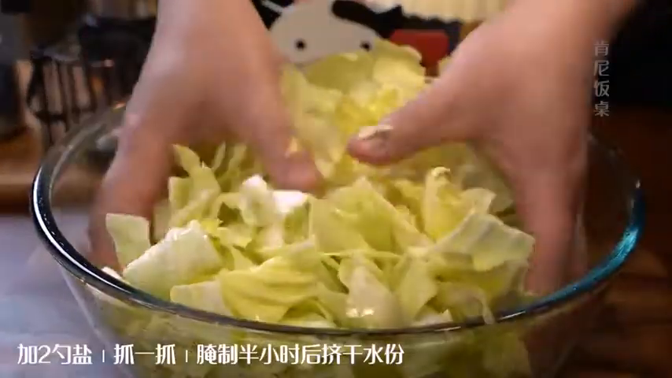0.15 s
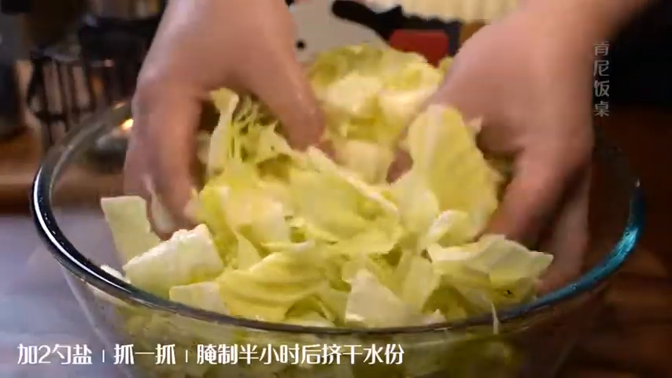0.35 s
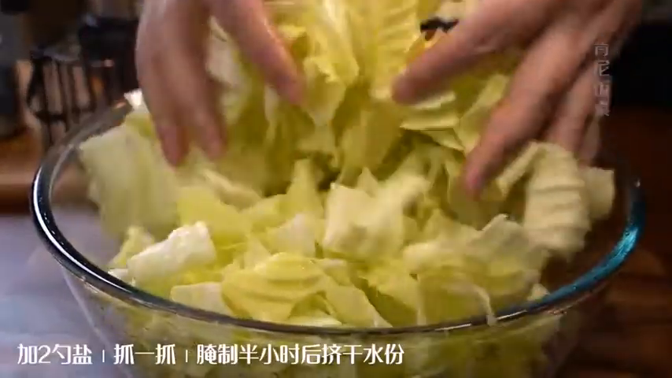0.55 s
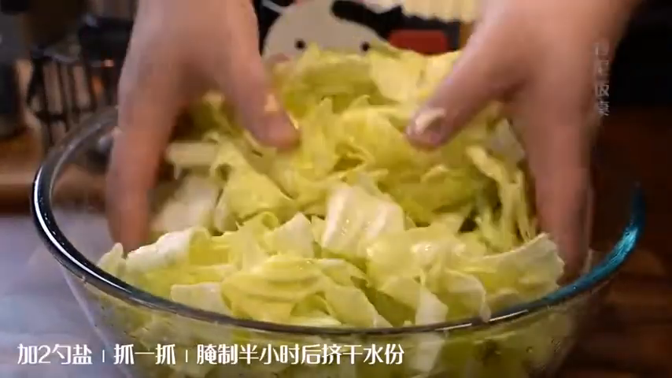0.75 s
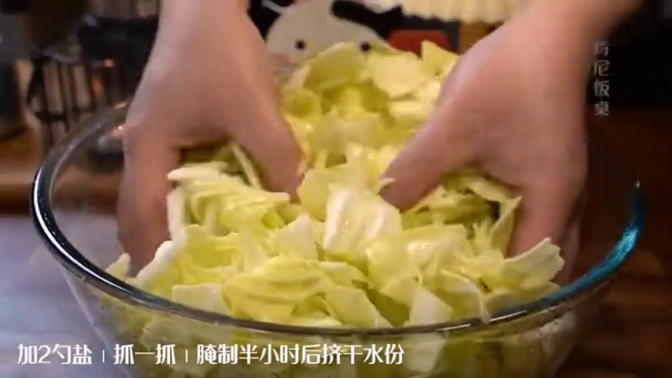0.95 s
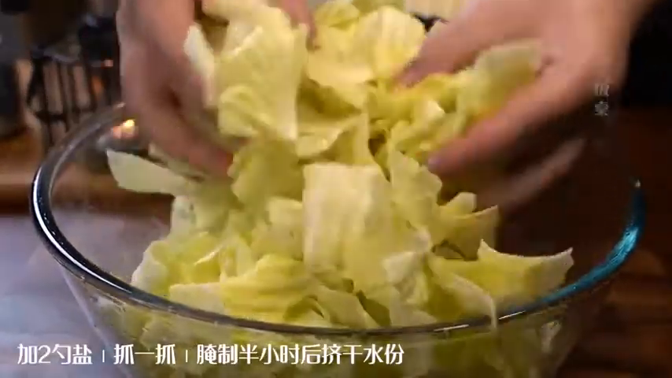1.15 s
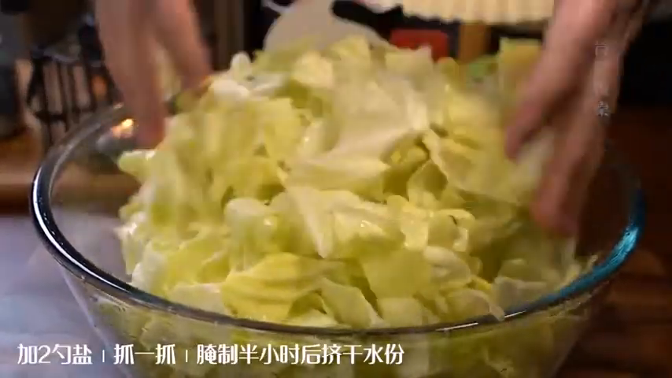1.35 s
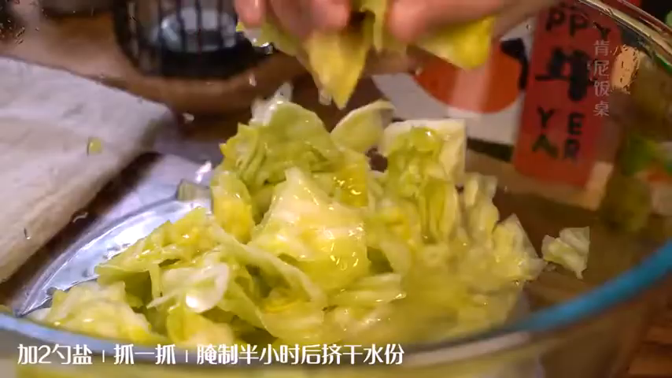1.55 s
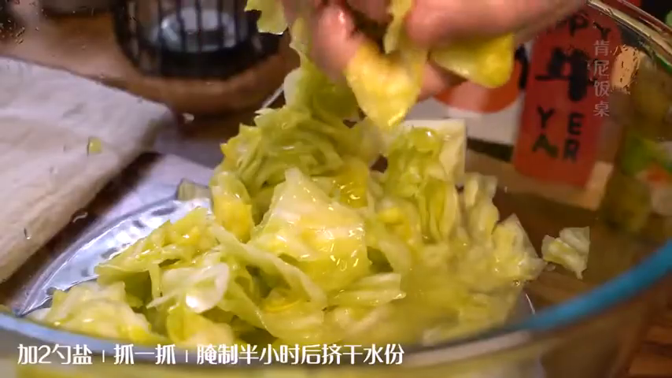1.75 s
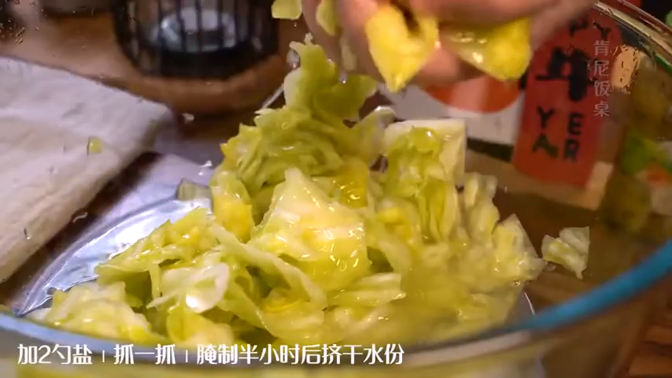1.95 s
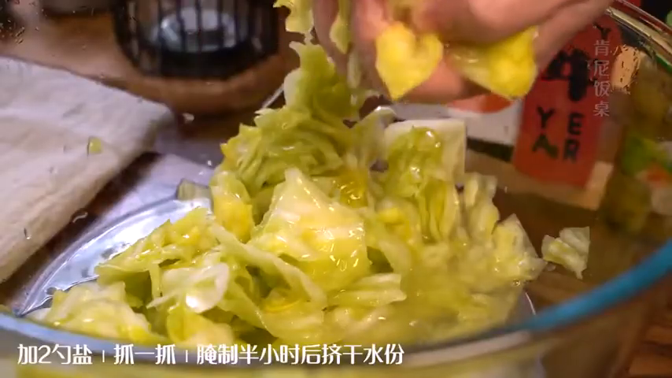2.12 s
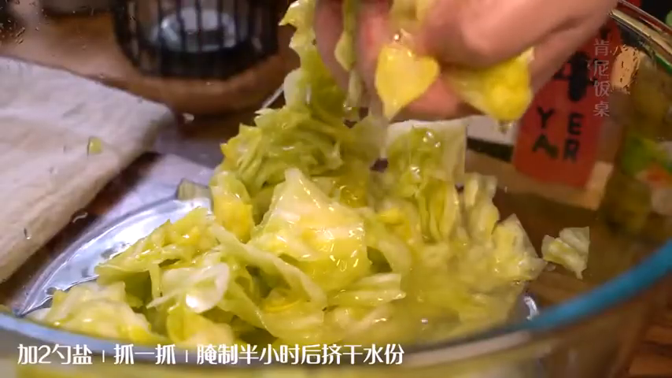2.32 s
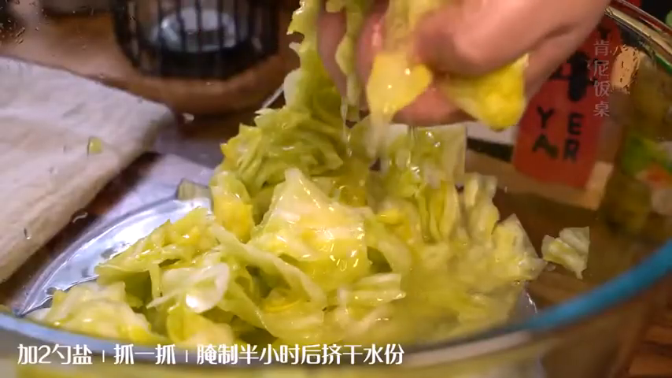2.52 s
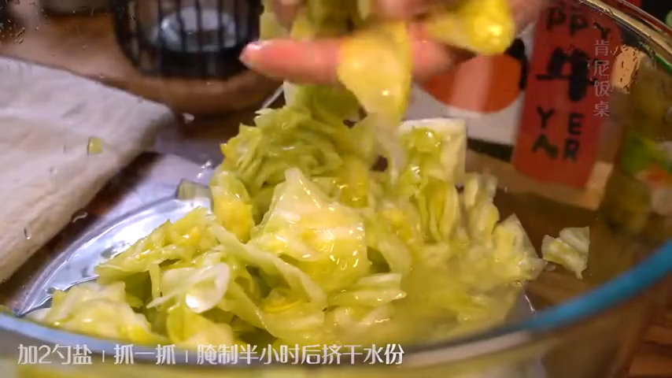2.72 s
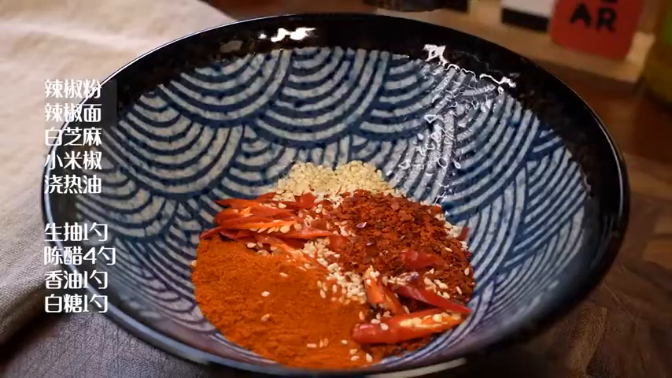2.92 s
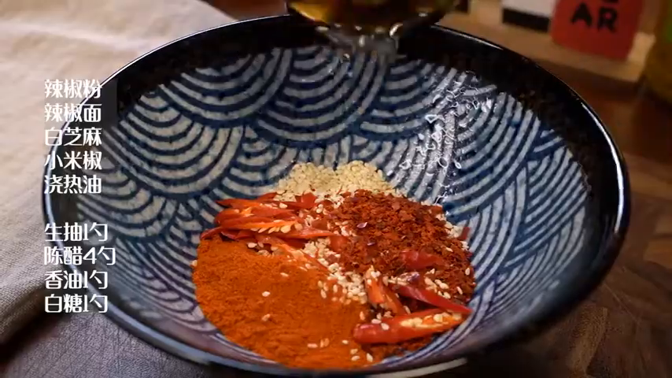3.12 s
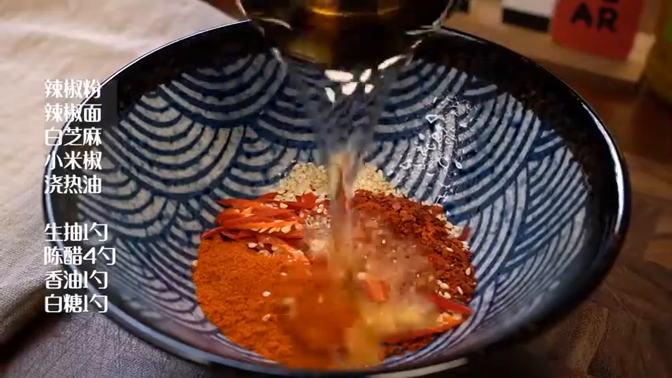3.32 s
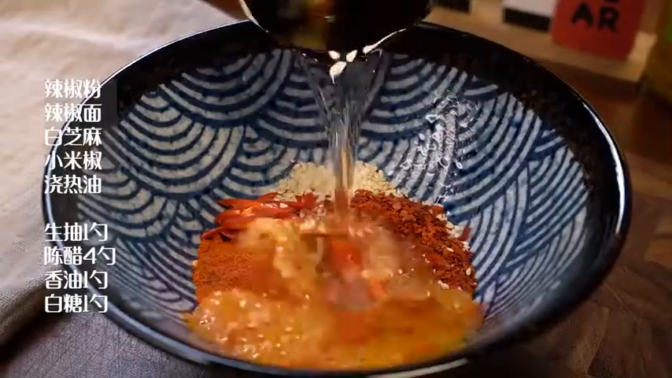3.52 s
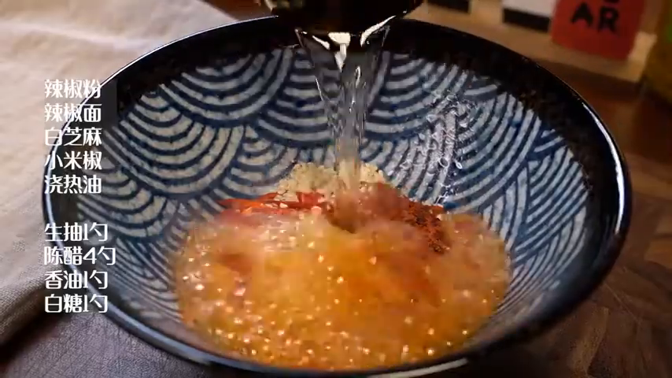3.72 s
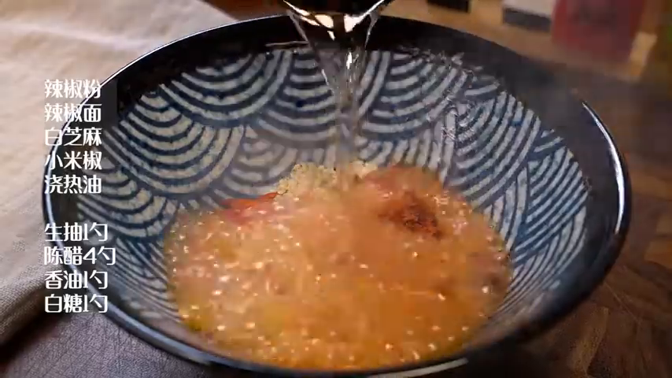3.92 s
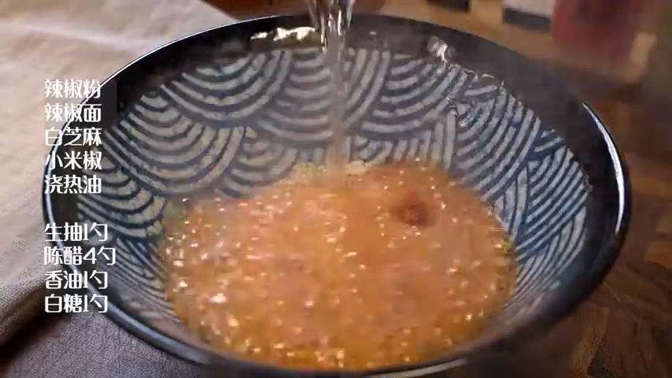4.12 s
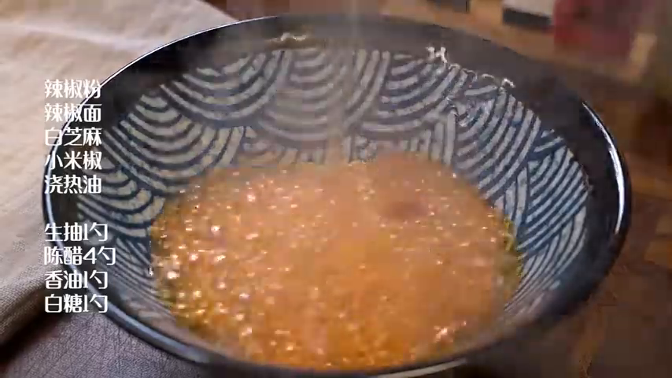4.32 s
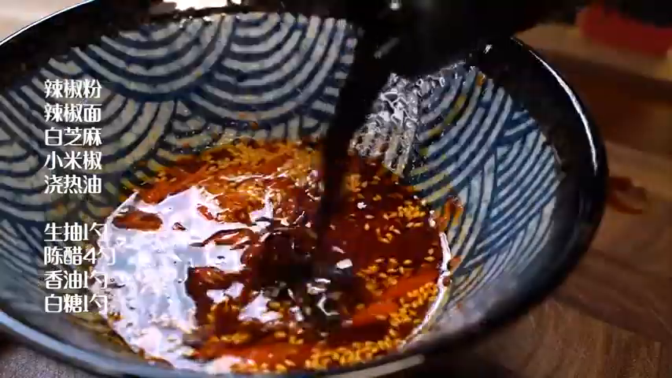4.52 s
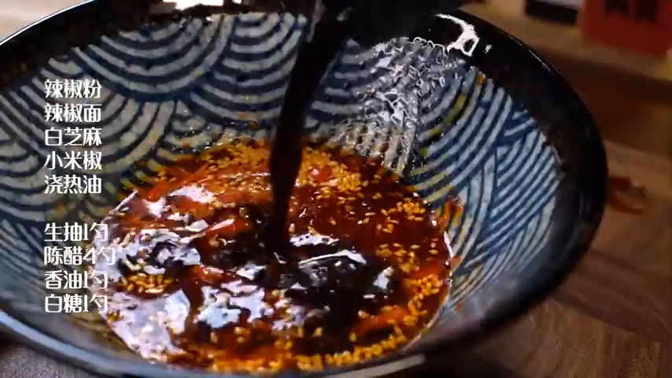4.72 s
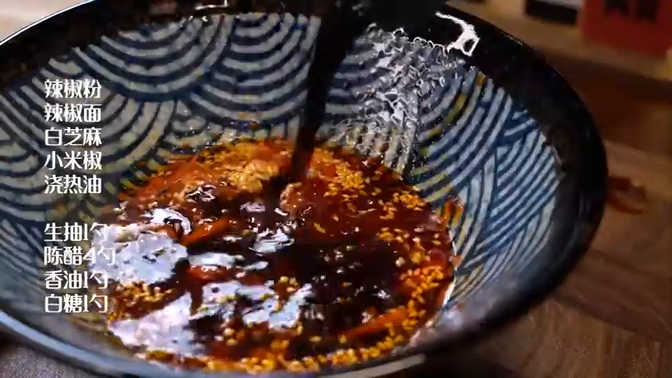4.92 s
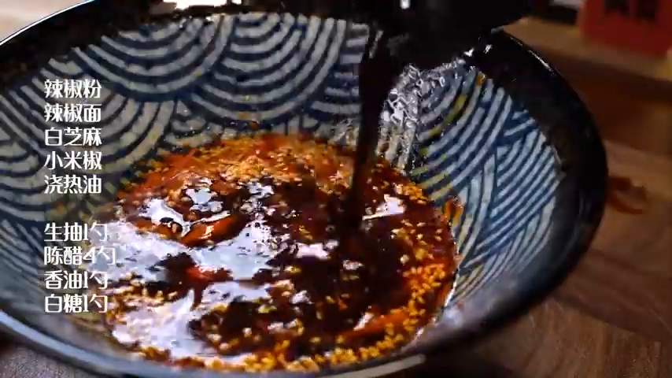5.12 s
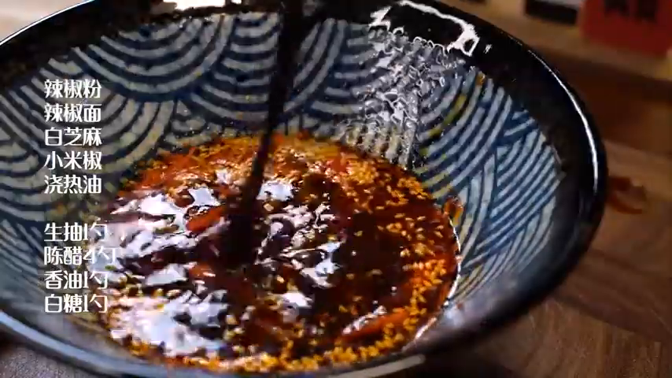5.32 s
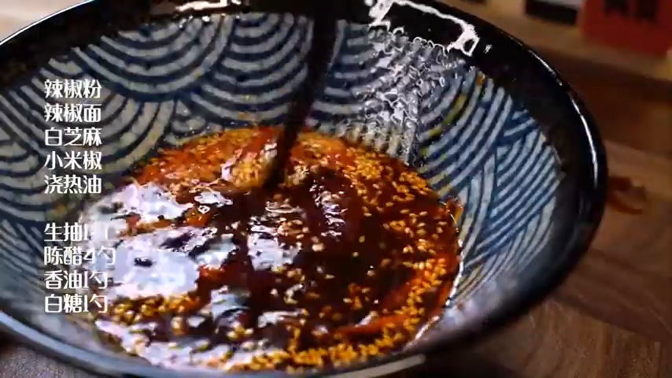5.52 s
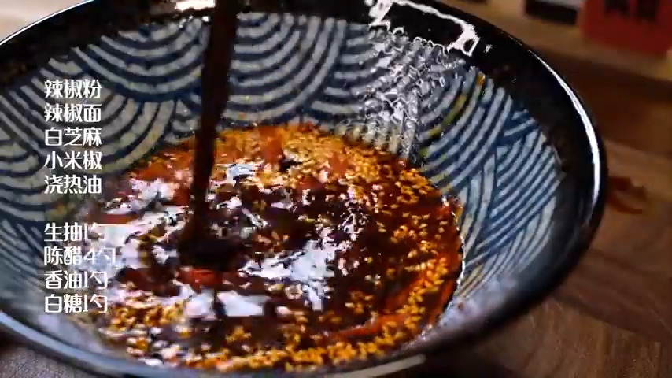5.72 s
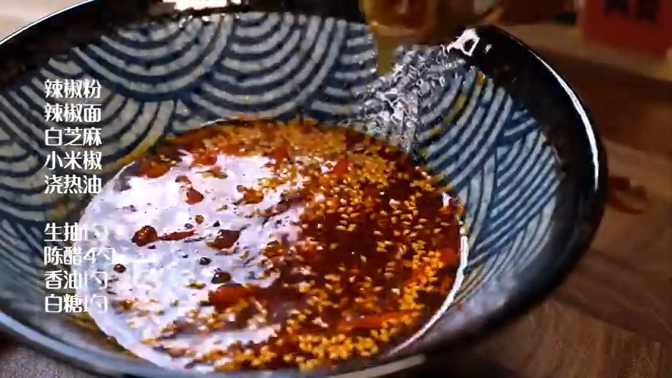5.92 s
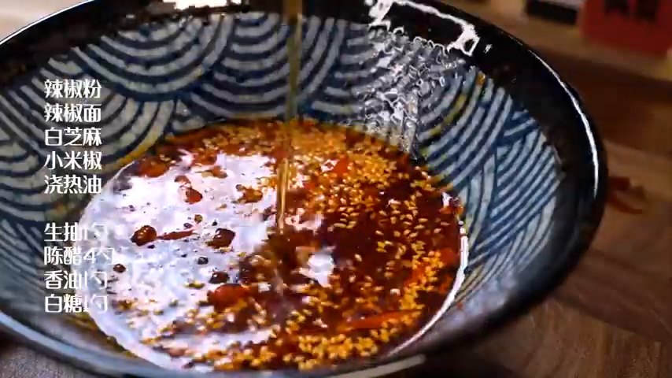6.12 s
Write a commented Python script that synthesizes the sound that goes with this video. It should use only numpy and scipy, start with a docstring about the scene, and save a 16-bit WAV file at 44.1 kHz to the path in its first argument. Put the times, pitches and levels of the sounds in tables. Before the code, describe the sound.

Crunchy leaves tossed by hand, wet squelching squeezes, a sudden bright oil sizzle on chili, then small bubbly pours of sauce, all close.

```python
"""In a quiet kitchen, several steps of preparing food are heard close up, one after another.
Hands toss salted cabbage in a glass bowl (dense clicks), then wring it (clumped clicks, short noise bursts).
Hot oil sizzles on chili flakes and sesame seeds: ticks, small chirping bubbles and low gurgles.
Sauces are poured into the oil: dying sines for bubbles, rising sines for glugs, bursts for splashes.
Faint coloured noise is the room, and later also the air in the open sauce bowl."""
import sys
import numpy as np
from scipy import signal
from scipy.io import wavfile
from scipy.ndimage import uniform_filter1d

SR = 44100
rng = np.random.default_rng(int(sys.argv[2]) if len(sys.argv) > 2 else 0)


def master_out(mix):
    """Clip the mix to full scale and print it as 16-bit PCM to the path in sys.argv[1]."""
    frames = np.transpose(np.atleast_2d(mix))
    ceiling = np.clip(frames, -1, 1)
    pcm = np.round(ceiling * 32767).astype(np.int16)
    wavfile.write(sys.argv[1], SR, pcm)


N = 271215
TIME = np.arange(N) / SR

# start of each step, and the end of the last [s]
TOSS_S, WRING_S, SIZZLE_S, POUR_S, END_S = 0, 1.44, 2.878, 4.428, 5.879
EDGE_HZ = 15900  # upper limit of the band

# Handfuls of leaves dug up, lifted and let fall:
# (time [s], hold [s], relative rustle level [dB], contact with the bowl relative to rustle [dB])
HANDFULS = [(0.0, 0.016, -41, -14), (0.127, 0.11, -24.5, -3), (0.204, 0.13, -20, -1),
            (0.349, 0.12, -22.5, -10), (0.518, 0.022, -32.5, -21), (0.662, 0.034, -51, 5),
            (0.799, 0.051, -22, -14), (0.854, 0.043, -19, 4), (0.962, 0.091, -20, -2.5),
            (1.063, 0.1, -26, -17), (1.34, 0.034, -57, 7), (2.712, 0.028, -25, -24.5)]
# each swells and dies away at steady rates; the leaves leave the glass sooner than they stop rustling
RISE_DB_PER_S, FALL_DB_PER_S, LIFT_OFF_DB_PER_S = 343, 228.5, 271
# Spectrum of crisp leaves: (frequency [Hz], density [dB per Hz])
CRISP_SPECTRUM = [(800, -21), (1050, -9), (1350, -7.5), (1550, -3), (1750, -9), (2000, -2.5), (2700, -4.5),
                  (4300, 2.5), (5200, -7), (8000, -15.5), (12300, -22), (15800, -30)]
# Hollow note of leaves against the bowl: (frequency [Hz], density [dB per Hz])
TOSS_HOLLOW_SPECTRUM = [(150, -65), (250, -26.5), (339, -6), (384, -36), (451, -5), (618, 7), (758, -14.5),
                        (900, -6), (1170, -48), (1980, -120)]
# Soft bumps of the tossed leaves: (frequency [Hz], density [dB per Hz])
TOSS_BUMP_SPECTRUM = [(15, -53.5), (25, -24.5), (75, -5), (108, -10.5), (300, -13.5), (390, -47),
                      (660, -120)]
# Modes of the glass rim brushed by a hand: (frequency [Hz], relative level [dB], decay time t60 [s])
RIM_MODES = [(600, -61, 0.077), (1540, -55.5, .35), (2400, -58, 0.34), (3470, -50, 0.12)]
RIM_S = 1.352

# Grip on the wet leaves: (time [s], relative squelch level [dB])
GRIP_LEVELS = [(1.445, -43), (1.53, -39), (1.645, -39.5), (1.72, -28.5), (1.80, -20), (1.861, -14),
               (1.925, -21), (2.055, -17), (2.085, -24), (2.25, -23.5), (2.37, -37.5), (2.429, -17),
               (2.51, -42), (2.57, -38), (2.65, -69.5), (2.711, -22.5), (2.872, -44)]
CUPPED_S = 1.5  # the hands close round the leaves and form a hollow
# Spectrum of wet leaves: (frequency [Hz], density [dB per Hz])
WET_SPECTRUM = [(800, -15), (1000, -25), (1300, -5.5), (1700, -14), (2050, -0.5), (2900, -7), (3550, 1.5),
                (4480, -2.5), (6000, -12), (8000, -18), (11000, -22.5), (15800, -31)]
# Hollow of hands and bowl: (frequency [Hz], density [dB per Hz])
WRING_HOLLOW_SPECTRUM = [(150, -45), (250, -15), (313, -27.5), (442, -17.5), (486, -4), (588, -1), (672, 9),
                         (950, -26.5), (1240, -36.5), (2090, -120)]
# Low bumps of the wrung leaves: (frequency [Hz], density [dB per Hz])
WRING_BUMP_SPECTRUM = [(18, -51), (30, -33), (116, -4.5), (204, 6.5), (300, -20.5), (390, -43), (660, -120)]
# Short bursts of noise from the leaves, many of them wet squirts:
# (time [s], relative rms level [dB], centre [Hz], length [s])
LEAF_BURSTS = [(0.215, -14, 4150, 0.0017), (0.267, -14, 3200, 0.0058), (0.996, -7.5, 4380, 0.0017),
               (1.482, -38, 2440, 0.025), (1.52, -34.5, 2200, 0.034), (1.744, -19, 3930, .003),
               (1.832, -12, 3500, 0.01), (1.954, -12.5, 2520, 0.0027), (2.029, -9.5, 4900, 0.0032),
               (2.049, -14.5, 3330, 0.009), (2.097, -10, 3380, 0.013), (2.118, -9.5, 4140, 0.0016),
               (2.134, -12, 4300, 0.0042), (2.166, -17.5, 3840, 0.0056), (2.174, -13, 3460, 0.0048),
               (2.225, -15, 2700, 0.0053), (2.253, -16.5, 3700, 0.005), (2.38, -12.5, 3600, 0.0032),
               (2.418, -10.5, 4220, 0.0049), (2.546, -19.5, 3630, 0.0045), (2.589, -20.5, 3850, 0.003),
               (2.683, -14.5, 4020, 0.014)]
# small squirts between these bursts: highest level relative to the grip, middle pitch and length
DRIBBLE_DB, DRIBBLE_HZ, DRIBBLE_S = 0.5, 4100, 0.0028
# Lumps of cabbage landing in the bowl:
# (time [s], peak level [dB], ring time t60 [s], weight: tilt toward the low modes [dB per octave])
CABBAGE_LUMPS = [(.245, -26.5, 0.15, 6), (.842, -25.5, 0.21, 9.5), (.885, -22, 0.2, 17),
                 (1.868, -30, 0.054, 2), (2.121, -21.5, 0.023, -6), (2.135, -16.5, 0.016, -7),
                 (2.42, -15.5, 0.018, -5)]
# Modes of the loaded bowl: (frequency before random detuning [Hz], level before the tilt [dB])
LOADED_BOWL_MODES = [(85, -48.5), (210, -34.5), (350, -5), (405, 1.5), (560, -0.5), (680, 4.5), (1310, -7)]

# the oil meets the chili; the fizz swells and holds until it stops
OIL_S, FIZZ_RISE_S, FIZZ_DB, FIZZ_FALL_S = 3.245, 0.057, -18.5, .003
POOL_S, BUBBLING_DB = .15, -31  # coarse bubbling grows as the oil pools
# Spectrum of frying ticks: (frequency [Hz], density [dB per Hz])
FRYING_SPECTRUM = [(600, -53), (805, -19), (957, -29), (1150, -16), (1490, -8.5), (2100, -2.5),
                   (3100, -1.5), (4300, 1.5), (5400, -2), (8000, -5), (12100, -8), (15800, -9.5)]
# Surges of the oil stream into its pool: (time [s], hold [s], gurgle level [dB])
OIL_SURGES = [(3.46, 0.14, -59), (3.71, 0.043, -55.5), (4.02, .02, -73.5), (4.11, .02, -64),
              (4.22, 0.042, -72)]
# each surge swells and subsides; it stirs up coarse bubbling by up to this much above its gurgle
SURGE_RISE_DB_PER_S, SUBSIDE_DB_PER_S, STIR_DB = 354, 150, 27.5
# Oil stream falling into its pool: (frequency [Hz], density [dB per Hz])
GURGLE_SPECTRUM = [(41, -38), (70, -19), (162, 4.5), (286, 1), (326, -13), (482, 11), (650, -5), (840, -42),
                   (1430, -120)]

# Gushes from the bottle: (time [s], length [s], relative trickle level [dB], relative foam level [dB])
BOTTLE_GUSHES = [(4.56, 0.11, -35.5, -45), (4.73, 0.048, -45.5, -52), (4.849, 0.054, -60.5, -49),
                 (4.913, 0.13, -43, -48), (5.293, 0.014, -33, -35), (5.373, 0.066, -51, -45),
                 (5.549, 0.091, -36.5, -36), (5.734, 0.19, -42, -43)]
# the trickle starts quickly and settles; its foam fizzes a little later and longer
GUSH_RISE_DB_PER_S, SETTLE_DB_PER_S, FOAM_LAG_S, FOAM_FADE_DB_PER_S = 897.5, 252.5, 0.023, 177.5
# Loudest bubbles in the sauce: (time [s], relative peak level [dB], base pitch [Hz], decay time t60 [s])
LOUD_BUBBLES = [(4.457, -20.5, 7050, 0.0059), (4.5355, -13, 3880, 0.014), (4.5443, -8, 6900, 0.0086),
                (4.555, -14, 4140, 0.013), (4.588, -0.5, 4300, 0.003), (4.6237, -10.5, 2070, 0.015),
                (4.6474, -23.5, 2950, 0.039), (4.659, -16, 1657, .036), (4.662, -6, 1156, 0.024),
                (4.716, -17.5, 4180, 0.0087), (4.763, -20, 2220, 0.0081), (4.849, -25, 11400, .005),
                (4.867, -19, 13500, 0.0033), (4.9357, -26, 3980, .011), (4.941, -14.5, 10200, 0.0045),
                (4.983, -26.5, 3650, .04), (4.9832, -12.5, 10850, .005), (5.004, -11.5, 9000, 0.0036),
                (5.012, -23, 8320, .0055), (5.0389, -7, 2210, .01), (5.066, -9.5, 1470, 0.012),
                (5.0793, -16.5, 10000, .0026), (5.1515, -20.5, 10950, 0.0046), (5.212, -25, 4500, 0.0059),
                (5.2823, -11, 4100, 0.004), (5.287, -16, 5900, .007), (5.298, -8.5, 4560, 0.0048),
                (5.3257, -15, 2450, 0.0027), (5.3324, -18, 9900, .0043), (5.346, -11.5, 10600, 0.0011),
                (5.4586, -7, 2280, 0.0048), (5.5261, -23.5, 2830, .0066), (5.5546, -15, 2080, 0.015),
                (5.568, -9, 1590, 0.013), (5.579, -13, 8300, .003), (5.5894, -3.5, 8600, 0.0018),
                (5.6012, -4.5, 1800, 0.0038), (5.6246, -8, 1236, 0.044), (5.7083, -1.5, 4270, 0.0015),
                (5.7433, -20, 4120, .017), (5.761, -6.5, 13700, .0012), (5.8005, -5, 4170, 0.0024),
                (5.814, -6, 1160, 0.016), (5.8383, 4, 1120, 0.0058), (5.877, -8, 5420, 0.014)]
# Air gulped by the bottle:
# (time [s], relative peak level [dB], starting pitch [Hz], length [s], pitch rise [octaves])
AIR_GULPS = [(4.437, -42, 197, 0.066, 3.5), (4.656, -29, 200, 0.14, 4.5), (4.766, -35, 263, 0.15, 0),
             (5.077, -30, 212, 0.098, 4), (5.263, -38.5, 204, 0.1, 2.3), (5.462, -34, 184, 0.094, 1),
             (5.705, -33, 81.5, 0.096, 2.5)]
# Sauce slapping the oil: (time [s], relative rms level [dB], centre [Hz], length [s])
SAUCE_SPLASHES = [(4.54, -34, 5440, 0.034), (4.94, -19.5, 11500, 0.006), (5.291, -19, 4860, 0.0074),
                  (5.305, -25.5, 2380, 0.0078), (5.563, -24, 2560, 0.0061), (5.6, -22, 5000, 0.0016)]
# Spectrum of the trickle: (frequency [Hz], density [dB per Hz])
TRICKLE_SPECTRUM = [(400, -35.5), (800, 13), (1000, -4), (1500, -20.5), (2300, -18), (4200, -17.5),
                    (6000, -17), (9000, -33)]
# Spectrum of the foam: (frequency [Hz], density [dB per Hz])
FOAM_SPECTRUM = [(2000, -52.5), (7000, -4.5), (10000, -4), (15500, -0.5)]
# The stream plunging into the sauce: (time [s], relative level [dB])
PLUNGE_LEVELS = [(5.79, -49), (5.82, -22.5), (5.85, -20), (5.875, -27)]
# Spectrum of the plunging stream: (frequency [Hz], density [dB per Hz])
CHURN_SPECTRUM = [(290, -45), (500, -24.5), (823, 1), (1520, 1.5), (2360, -17), (2960, -4.5), (3460, -12),
                  (4050, -1.5), (5540, -10.5), (15000, -43)]
# Cavity modes of the sauce bowl: (frequency [Hz], relative level [dB], decay time t60 [s])
CAVITY_MODES = [(786.5, 1.5, 0.07), (1248, -0.5, 0.1), (1637, 1.5, 0.029), (2270, -8, 0.037),
                (3140, -17, .03), (4140, 3.5, 0.03)]

# Noise of the room: (frequency [Hz], density [dB per Hz])
ROOM_SPECTRUM = [(30, -13.5), (70, -6), (130, -17.5), (350, -11), (700, -23.5), (2000, -27), (15000, -37)]
ROOM_DB, EARLY_ROOM_DB = -72.5, -4.5  # level, and its change before the sizzle begins
# Room noise ringing faintly in the open sauce bowl: (frequency [Hz], density [dB per Hz])
BOWL_AIR_SPECTRUM = [(700, -25.5), (930, -10), (1090, 6), (1330, -2.5), (1500, -23), (2200, -35)]
BOWL_AIR_DB = -63


def tossing(press=1.0, treble_follow=0.9, bump_follow=1.8):
    """Friction and fracture: crisp leaves rub and snap, fuller when pressed; the bowl adds a hollow note and bumps."""
    rustle = swells([row[:3] for row in HANDFULS], RISE_DB_PER_S, FALL_DB_PER_S)
    touches = [(s, hold, db + touch_db) for s, hold, db, touch_db in HANDFULS]
    contact = swells(touches, RISE_DB_PER_S, LIFT_OFF_DB_PER_S)
    snaps = crackle(per_s=5800, spread_db=3.5, clump_db=2.0, clump_s=.0042, hiss=0.62)
    nudges = crackle(per_s=350, spread_db=2, clump_db=2, clump_s=.012, hiss=.6)
    body, crisp, top = bands(colour(snaps, CRISP_SPECTRUM), low_hz=2220, high_hz=5810)
    pressed_body = body * (rustle / amp(-18.5)) ** press
    out = amp(-0.5) * rustle * (crisp + pressed_body)
    out += amp(-6) * rustle ** treble_follow * top
    out += amp(-14.5) * contact * colour(nudges, TOSS_HOLLOW_SPECTRUM)
    out += amp(-30) * contact ** bump_follow * colour(nudges, TOSS_BUMP_SPECTRUM)
    add(out, RIM_S, amp(-1.5) * ring(RIM_MODES))
    return out * during(TOSS_S, SIZZLE_S)


def wringing(press=1.0, treble_follow=0.45, hollow_follow=1.36, bump_follow=1.78):
    """Intermittent yielding: wet leaves give way in clumped bursts; a hard grip deepens them and sounds the hollow."""
    grip, = levels(GRIP_LEVELS)
    bursts = crackle(per_s=2200, spread_db=5.0, clump_db=3.5, clump_s=.0042, hiss=.35)
    body, crisp, top = bands(colour(bursts, WET_SPECTRUM), low_hz=1800, high_hz=6240)
    pressed_body = body * (grip / amp(-18.5)) ** press
    out = amp(-2.5) * grip * (crisp + pressed_body)
    out += amp(-24.5) * grip ** treble_follow * top
    cupped = grip ** hollow_follow * during(CUPPED_S, SIZZLE_S)
    out += amp(-12) * cupped * colour(bursts, WRING_HOLLOW_SPECTRUM)
    out += amp(-30.5) * grip ** bump_follow * colour(bursts, WRING_BUMP_SPECTRUM)
    return (out + dribbles(grip, count=45)) * during(WRING_S, SIZZLE_S)


def dribbles(grip, count):
    """Pressure-driven flow: small squirts at random moments, their strength bounded by the grip."""
    when, strength, size = rng.random((count, 3)).T
    times = WRING_S + when * (SIZZLE_S - WRING_S)
    db = 20 * np.log10(np.interp(times, TIME, grip)) + DRIBBLE_DB - 6 * strength
    pitches = DRIBBLE_HZ * 2 ** (size - .5)
    rows = [(s, level, hz, DRIBBLE_S) for s, level, hz in zip(times, db, pitches)]
    return spurts(rows, sharpness=1.4, spray=.05, level_db=-0.5)


def lumps(contact_s=0.017):
    """Modal excitation by impact: soft wet lumps thump the loaded bowl; heavy ones favour its low modes."""
    out = np.zeros(N)
    for s, db, t60, weight_db in CABBAGE_LUMPS:
        modes = [(hz * rng.uniform(0.94, 1.05), mode_db - weight_db * np.log2(hz), t60)
                 for hz, mode_db in LOADED_BOWL_MODES]
        thump = ring(modes)
        thump *= 1 - np.exp(-TIME[:len(thump)] / contact_s)  # a soft contact builds up gradually
        add(out, s, amp(db) * thump / abs(thump).max())
    return out


def sizzling():
    """Flash boiling: moisture turns to steam in ticks and pings; coarse bubbles and gurgles follow as the oil pools."""
    span, age = (OIL_S, POUR_S), np.maximum(TIME - OIL_S, 0)
    heat = np.minimum(age / FIZZ_RISE_S, 1) ** 3
    heat *= np.clip((POUR_S - TIME) / FIZZ_FALL_S, 0, 1)
    pool = 1 - np.exp(-age / POOL_S)
    gurgle = swells(OIL_SURGES, SURGE_RISE_DB_PER_S, SUBSIDE_DB_PER_S)
    ticks = crackle(per_s=4600, spread_db=5.0, clump_db=1.57, clump_s=0.0029, hiss=0.52)
    coarse, fine = split(colour(ticks, FRYING_SPECTRUM), hz=2300)
    pings = chirps(span, count=900, low_hz=3340, high_hz=15100, cycles=34, spread_db=5.0, rise=.05)
    blips = crackle(per_s=1100, spread_db=4.5, clump_db=3, clump_s=0.012, hiss=0.18)
    bubbling = amp(BUBBLING_DB) + amp(STIR_DB) * pool ** 2 * gurgle
    out = heat * amp(FIZZ_DB) * (fine + amp(-13.5) * pings)
    out += heat * pool * bubbling * coarse
    out += gurgle * colour(blips, GURGLE_SPECTRUM)
    return out * during(*span)


def pouring():
    """Air entrainment: gushes trickle, foam and splash, exciting the cavity of the bowl, while the bottle glugs."""
    trickle_rows = [row[:3] for row in BOTTLE_GUSHES]
    foam_rows = [(s + FOAM_LAG_S, length, db) for s, length, _, db in BOTTLE_GUSHES]
    trickle = swells(trickle_rows, GUSH_RISE_DB_PER_S, SETTLE_DB_PER_S)
    foam = swells(foam_rows, GUSH_RISE_DB_PER_S, FOAM_FADE_DB_PER_S)
    span = POUR_S, END_S
    drops = chirps(span, count=560, low_hz=1440, high_hz=5510, cycles=22.5, spread_db=8.5, rise=0.16)
    froth = chirps(span, count=200, low_hz=6850, high_hz=14200, cycles=47, spread_db=14.5, rise=.05)
    foam_clicks = crackle(per_s=380, spread_db=10, clump_db=7.5, clump_s=0.0048, hiss=.1)
    trickle_clicks = crackle(per_s=650, spread_db=17.5, clump_db=10.5, clump_s=0.0067, hiss=0.22)
    out = pops() + amp(-0.5) * trickle * drops
    out += amp(1) * foam * froth
    out += amp(-2) * foam * colour(foam_clicks, FOAM_SPECTRUM)
    out += amp(-10.5) * trickle * colour(trickle_clicks, TRICKLE_SPECTRUM)
    out += spurts(SAUCE_SPLASHES, sharpness=1.8, spray=.05, level_db=-4.0)
    plunge = levels(PLUNGE_LEVELS)[0] * during(PLUNGE_LEVELS[0][0], END_S)
    out += plunge * colour(rng.standard_normal(N), CHURN_SPECTRUM)
    out = signal.sosfilt(signal.butter(4, 620, "high", fs=SR, output="sos"), out)
    out += amp(-47.5) * signal.oaconvolve(out, ring(CAVITY_MODES))[:N]
    out += amp(-1.5) * glugs()
    return (out + amp(-12.5) * echoes(out, t60=0.13)) * during(POUR_S, END_S)


def pops(snap_db=-5, snap_s=0.00012, wet_db=-21, wet_s=0.0024):
    """Bubble resonance: each loud bubble snaps free and rings, with a fine wet spatter mostly above its pitch."""
    out = np.zeros(N)
    for s, db, hz, t60 in LOUD_BUBBLES:
        tone = bubble(hz, t60, rise=0.087)
        t = TIME[:len(tone)]
        film = signal.butter(1, [.8 * hz, min(3 * hz, EDGE_HZ)], "band", fs=SR)
        noise = signal.lfilter(*film, rng.standard_normal(len(t)))
        spatter = unit(signal.lfilter(*film, noise))
        spatter *= amp(snap_db) * np.exp(-t / snap_s) + amp(wet_db) * np.exp(-t / wet_s)
        add(out, s, amp(db) * (amp(5.0) * tone + spatter))
    return out


def glugs(swell_share=0.11, slosh=0.63):
    """Resonance of a closing cavity: air pockets ring low, most sweeping upward as they close; sloshing wavers them."""
    out = np.zeros(N)
    for s, db, hz, length, octaves in AIR_GULPS:
        u = np.arange(int(length * SR)) / (length * SR)  # share of the glug elapsed
        envelope = u ** 2 * np.exp(-u / swell_share) * (1 - u ** 8)
        waver = 1 + slosh * u * unit(uniform_filter1d(rng.standard_normal(len(u)), size=250))
        pitch = hz * 2 ** (octaves * u ** 3)
        tone = np.sin(2 * np.pi * np.cumsum(pitch) / SR)
        add(out, s, amp(db) * envelope / envelope.max() * waver * tone)
    return out


def chirps(span, count, low_hz, high_hz, cycles, spread_db, rise):
    """Superposition: a swarm of small bubbles of random pitch and strength between two times, at rms 1."""
    out = np.zeros(N)
    for when, size, strength in rng.random((count, 3)):
        hz = low_hz * (high_hz / low_hz) ** size
        s = span[0] + when * (span[1] - span[0])
        gain = amp(-spread_db * np.log(strength + 0.015))
        add(out, s, gain * bubble(hz, cycles / hz, rise))
    return unit(out)


def bubble(hz, t60, rise, pinch=0.24):
    """Damped bubble oscillation: sharp for a cycle as it pinches off, then climbing by the share rise to the surface."""
    t = TIME[:int((t60 + .02) * SR)]
    pitch = hz * (1 + pinch * np.exp(-t * hz) + rise * np.minimum(t / t60, 1))
    turns = np.cumsum(pitch) / SR
    onset = 1 - np.exp(-turns / 0.87)
    return np.sin(2 * np.pi * turns) * np.exp(-np.log(1000) * t / t60) * onset


def spurts(rows, sharpness, spray, level_db):
    """Resonant noise burst: sputtering noise through a peak filter whistles briefly, with some bright spray."""
    out, t = np.zeros(N), TIME[:SR // 4]
    for s, db, hz, length in rows:
        sputter = amp(5 * np.repeat(rng.standard_normal(len(t)), 90)[:len(t)])
        jet = rng.standard_normal(len(t)) * sputter  # the strength jumps about every 2 ms
        gap = signal.iirpeak(hz, sharpness, fs=SR)
        whistle = unit(signal.lfilter(*gap, signal.lfilter(*gap, jet)))
        envelope = t ** 2 * np.exp(-t / (0.26 * length))
        burst = (whistle + spray * np.gradient(jet)) * envelope
        # the energy is that of a steady sound of this level and length
        add(out, s, amp(db + level_db) * burst * np.sqrt(length * SR / np.sum(burst ** 2)))
    return out


def crackle(per_s, spread_db, clump_db, clump_s, hiss):
    """Random impulse process: clumped clicks of widely varying size over hiss, with the slow level evened out."""
    size = amp(spread_db * np.minimum(rng.exponential(1, N), 4))
    clicks = size * rng.choice([-1, 1], N) * (rng.random(N) < per_s / SR)
    knots = np.cumsum(rng.uniform(.5, 1.5, N // 20)) * clump_s
    knot_heights = np.clip(rng.standard_normal(len(knots)), -2, 2)
    clumps = amp(clump_db * np.interp(TIME, knots, knot_heights))
    x = (unit(clicks) + hiss * rng.standard_normal(N)) * clumps
    return x / np.sqrt(uniform_filter1d(x ** 2, size=3500) + 1e-9)


def ring(modes):
    """Modal decay: a sum of exponentially dying sines."""
    t = TIME[:SR // 2]
    return sum(amp(db) * np.exp(-np.log(1000) * t / t60) * np.sin(2 * np.pi * hz * t) for hz, db, t60 in modes)


def echoes(x, t60):
    """Reverberation: dense decaying reflections from bowl, counter and walls, with a response of energy 1."""
    t = TIME[:SR // 2]
    tail = rng.standard_normal(len(t)) * np.exp(-np.log(1000) * t / t60) * (t > .002)
    return signal.oaconvolve(x, tail / np.linalg.norm(tail))[:N]


def room_noise():
    """Stationary coloured noise: a quiet room, quieter before the sizzle begins, and its noise ringing in the
    sauce bowl."""
    room_level = amp(ROOM_DB + EARLY_ROOM_DB * (TIME < SIZZLE_S))
    room = room_level * colour(rng.standard_normal(N), ROOM_SPECTRUM)
    stirring_air = crackle(per_s=3600, spread_db=1.5, clump_db=1, clump_s=.04, hiss=2.5)
    return room + amp(BOWL_AIR_DB) * colour(stirring_air, BOWL_AIR_SPECTRUM) * (TIME > SIZZLE_S)


def amp(db):
    """Logarithmic level: converts decibels to an amplitude ratio."""
    return 10 ** (np.asarray(db) / 20)


def unit(x):
    """Normalization: scales to rms 1."""
    return x / np.sqrt(np.mean(x ** 2) + 1e-20)


def add(mix, s, sound):
    """Superposition: mixes a sound in place at time s."""
    part = mix[max(round(s * SR), 0):][:len(sound)]
    part += sound[:len(part)]


def levels(rows):
    """Envelope interpolation: one gain curve, linear in decibels, for each level column."""
    s, *columns = np.transpose(rows)
    return [amp(np.interp(TIME, s, db)) for db in columns]


def during(start, end):
    """Gating: on between two times, with ramps of about 2 ms."""
    return uniform_filter1d(1. * ((TIME >= start) & (TIME < end)), size=90)


def swell(start, hold, db, rise_db_per_s, fall_db_per_s):
    """Exponential growth and decay: gain climbs to db at the start, holds, and dies away."""
    early, late = np.maximum(start - TIME, 0), np.maximum(TIME - start - hold, 0)
    return amp(np.maximum(db - rise_db_per_s * early - fall_db_per_s * late, -140))


def swells(rows, rise_db_per_s, fall_db_per_s):
    """Dominance: the strongest of several swells (time [s], hold [s], level [dB]) at each moment."""
    return np.max([swell(s, hold, db, rise_db_per_s, fall_db_per_s) for s, hold, db in rows], axis=0)


def colour(x, spectrum):
    """Minimum-phase filtering: shapes the spectrum causally, so that clicks keep sharp fronts; result has rms 1."""
    hz, db = np.transpose(spectrum)
    f = abs(np.fft.fftfreq(4096, 1 / SR)) + 1
    skirt = 40 * np.log10(np.minimum(f / hz[0], 1) * np.minimum(hz[-1] / f, 1))  # beyond the end points
    gain_db = np.interp(np.log(f), np.log(hz), db) + skirt
    log_gain = np.log(amp(np.maximum(gain_db, -100)))
    taps = np.fft.ifft(np.exp(signal.hilbert(log_gain).conj())).real
    return unit(signal.oaconvolve(x, taps[:len(taps) // 2])[:N])


def split(x, hz):
    """Band division: parts below and above a frequency, each at rms 1."""
    filters = [signal.butter(3, hz, kind, fs=SR, output="sos") for kind in ("low", "high")]
    return [unit(signal.sosfilt(sos, x)) for sos in filters]


def bands(x, low_hz, high_hz):
    """Band division: parts below, between and above two frequencies; the lower two sum to rms 1, the top has rms 1."""
    under, top = split(x, high_hz)
    body = signal.sosfiltfilt(signal.butter(2, low_hz, fs=SR, output="sos"), under)
    return body, under - body, top


def scene():
    """Superposition of all the steps and the room's noise, identical in both channels."""
    blows = spurts(LEAF_BURSTS, sharpness=1.77, spray=.03, level_db=-2.0) + lumps()
    cabbage = tossing() + wringing() + blows + amp(-10.0) * echoes(blows, t60=0.098)
    mono = cabbage + sizzling() + pouring() + room_noise()
    return np.array([mono, mono])


def record(dry):
    """Saturation and band limiting: peaks are rounded off below 1, then the highest frequencies are removed."""
    rounded = dry / (1 + dry ** 4) ** (1 / 4)
    low_pass = signal.firwin(401, EDGE_HZ, window=("kaiser", 8), fs=SR)
    return signal.oaconvolve(rounded, low_pass[None], "same")


dry = scene()
out = record(dry)
master_out(out)
```